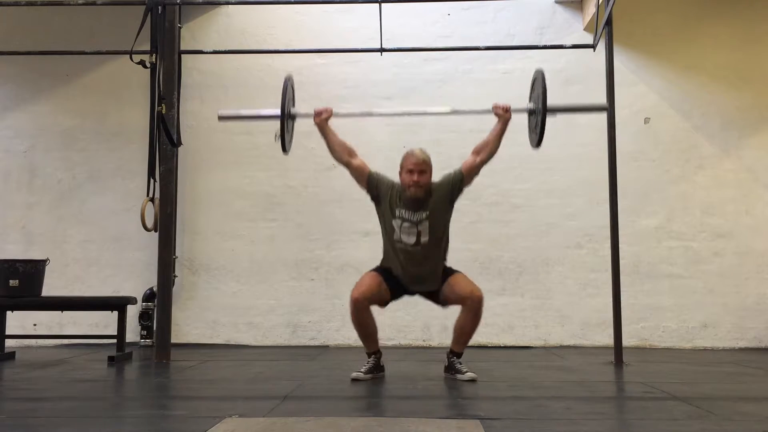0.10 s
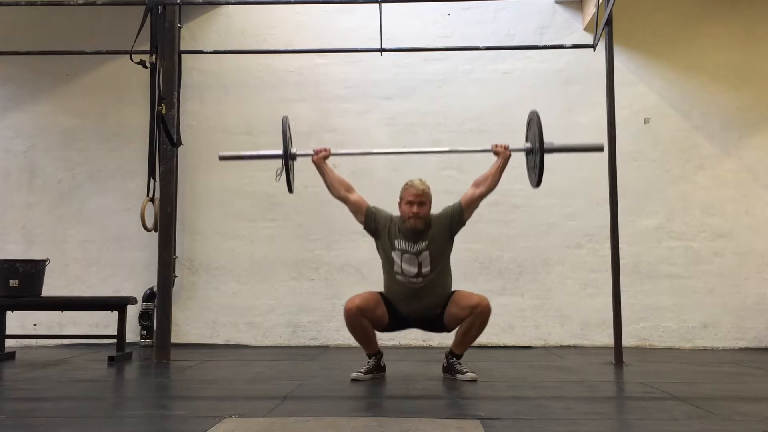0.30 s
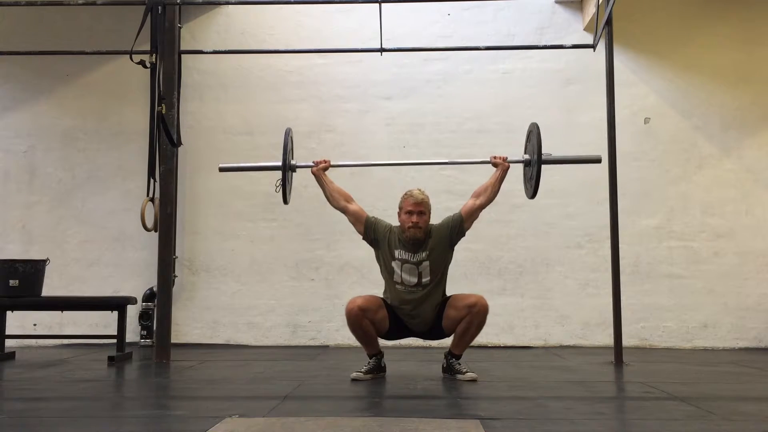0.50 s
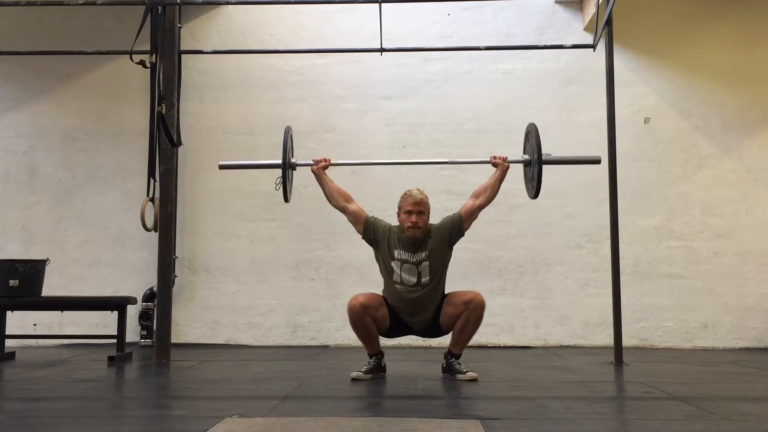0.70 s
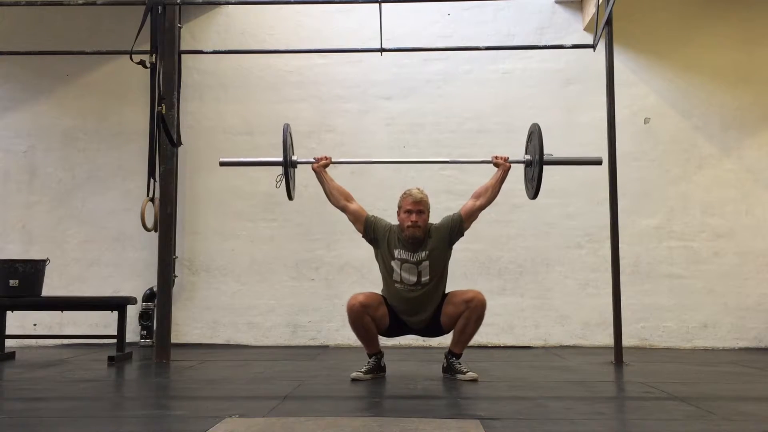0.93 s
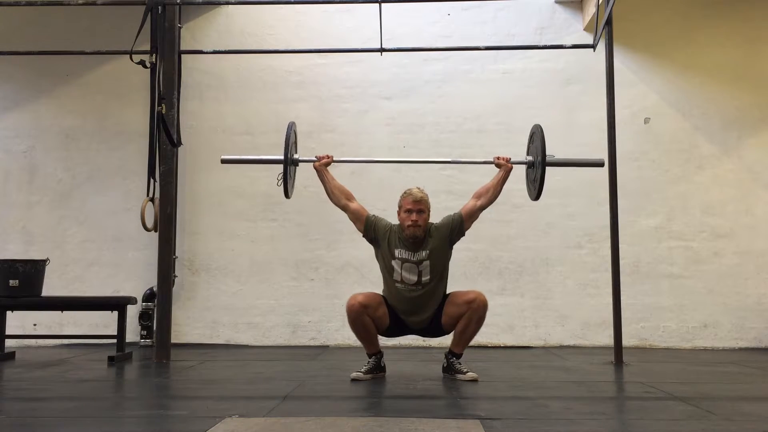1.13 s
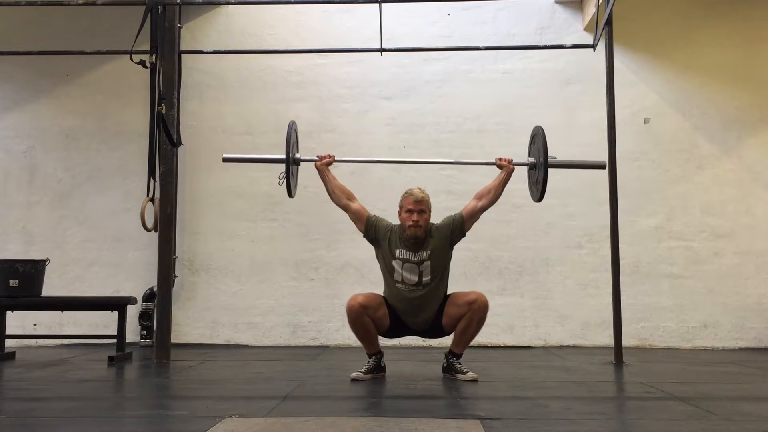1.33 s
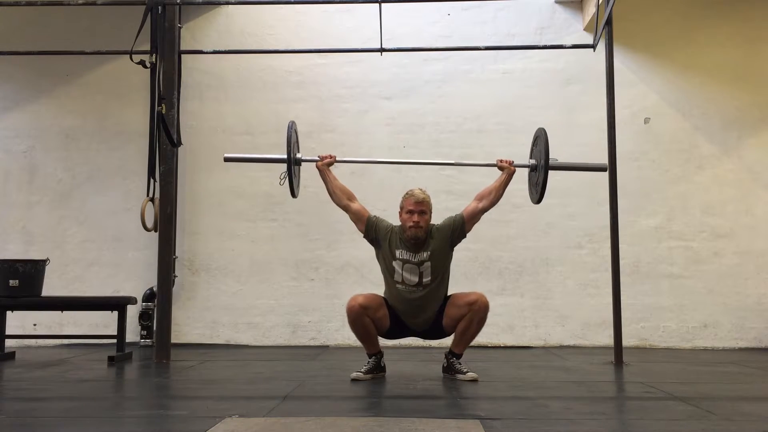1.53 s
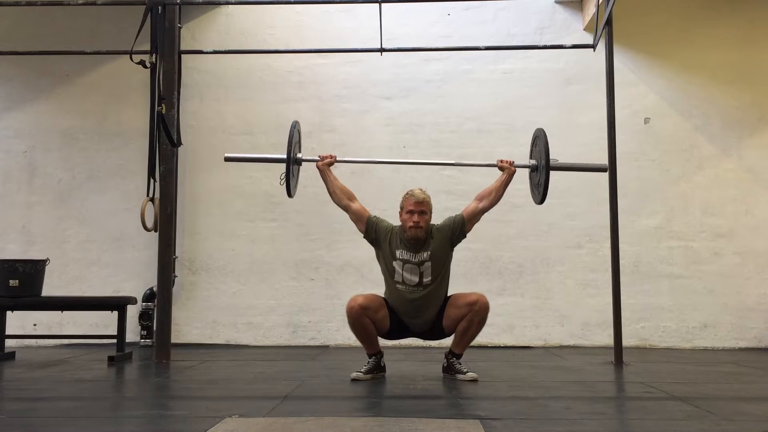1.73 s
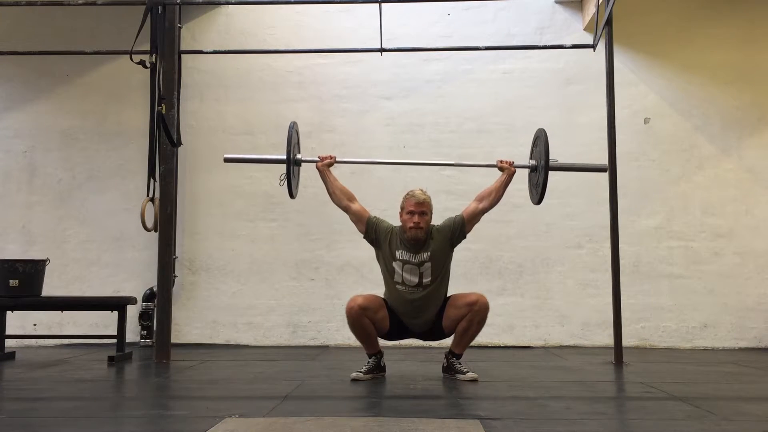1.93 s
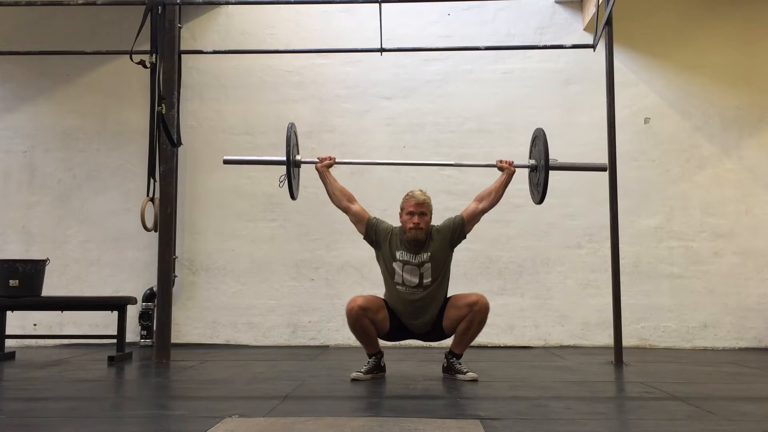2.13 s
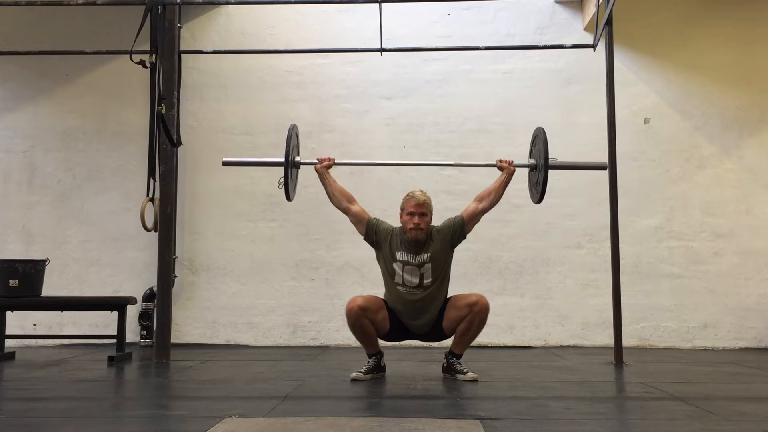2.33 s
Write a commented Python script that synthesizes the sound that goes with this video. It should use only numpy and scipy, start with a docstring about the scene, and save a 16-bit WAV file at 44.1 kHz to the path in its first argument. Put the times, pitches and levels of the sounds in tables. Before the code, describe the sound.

A single sharp slap of shoes on a rubber gym floor, preceded by a faint metallic rattle of barbell plates, then a long hollow reverberation in a large bare hall with low ventilation drone; one distant microphone.

```python
"""Shoe slap in a gym hall

A lifter's shoes slap a rubber floor once under a barbell: a burst of noisy cracks and damped mat modes.
Six early echoes, band-wise decaying noise and standing waves ring on for over a second; the slab booms low.
Noise-driven plate resonances chatter faintly before the landing and fade after it.
Ventilation drones throughout, as coloured noise with narrow noise bands.
"""
import sys
import numpy as np
from scipy import signal
from scipy.io import wavfile
from scipy.ndimage import uniform_filter1d

SR = 44100
rng = np.random.default_rng(int(sys.argv[2]) if len(sys.argv) > 2 else 0)


def output_pcm(signal):
    """Save a mono or channel-first signal as 16-bit PCM at the path in sys.argv[1].

    Samples are clipped to [-1, 1] before scaling.
    """
    pcm = np.clip(np.atleast_2d(signal).T, -1, 1) * 32767
    wavfile.write(sys.argv[1], SR, np.round(pcm).astype(np.int16))


def elevation(decibels):
    """Turn decibel levels (scalar or array-like) into linear amplitude ratios."""
    levels = np.asarray(decibels, float)
    return 10 ** (levels / 20)


N = 108045  # samples
LAND_S = 0.2053  # the shoes meet the floor

# Relative spectrum of the cracks: (frequency [Hz], density [dB per Hz])
CRACK_SPECTRUM = [(200, -45), (500, -20.5), (1000, 0.5), (1500, -1), (1950, -13), (2400, 1), (2750, -13),
                  (3400, -0.5), (4300, -10.5), (5100, -12.5), (6300, -19), (7500, -9), (9000, -19),
                  (11000, -23.5), (13500, -23.5), (16000, -32)]
# Damped modes of the rubber mat: (frequency [Hz], starting amplitude [dB], T60 [s])
MAT_MODES = [(378.5, -18, 0.0526), (643, -7.5, 0.044)]
# First echoes from near walls and roof: (delay [s], crack gain [dB], mat gain [dB], low-pass corner [Hz])
EARLY_ECHOES = [(.0036, -11, -16, 8000), (.0097, -6.5, -4.5, 6030), (0.0119, -6, -12.5, 14020),
                (.0203, -2.5, -0.5, 8000), (0.0239, -11.5, -10, 5940), (0.0287, -16, -3, 5930)]
# Relative starting spectrum of the reverberation: (frequency [Hz], density [dB per Hz])
HALL_SPECTRUM = [(90, -45), (150, -15), (250, -21), (285, -2), (350, -0.5), (460, -6), (640, -5.5),
                 (730, -10), (1000, -13), (1300, -18.5), (2000, -19), (3000, -22.5), (4000, -23),
                 (4500, -28.5), (6500, -30), (9000, -38.5), (12000, -45), (15500, -50), (16100, -71)]
# Reverberation time of the hall: (frequency [Hz], T60 [s])
HALL_DECAY = [(120, 0.55), (240, 1.0), (300, 1.294), (430, 1.37), (550, 1.73), (700, 1.98), (1300, 2.2),
              (2500, 1.886), (4500, 1.536), (7000, 1.03), (10000, 0.72), (12500, .62), (15500, .5)]
# Standing waves in the tail: (frequency [Hz], width of each pass [Hz], starting level [dB], T60 [s])
STANDING_WAVES = [(281.3, 15, -24.5, 0.8), (339, 6, -20.5, 0.48), (417, 22, -19.5, .6),
                  (503, 16, -26.5, .7), (578, 11, -28.5, 0.65), (645, 12, -27, .8), (685, 28, -28, 1.0),
                  (1144, 15, -31.5, 1.0)]
# Resonances of the plates: (frequency [Hz], width of each pass [Hz], relative level [dB])
PLATE_MODES = [(1663, 130, -3), (3000, 260, -4.5), (5290, 150, -5), (7330, 740, -11), (8350, 990, -9),
               (11400, 2000, -21), (15000, 1200, -28), (3600, 5400, -10)]
# Brief harder rubs:
# (time [s], added force re steady rub [dB], centre frequency [Hz], spread [octaves], fade constant [s])
HARD_RUBS = [(.0885, 14, 11000, .6, .003), (.090, 9, 5290, .15, .008), (.103, 10, 8200, .2, .006)]
# Relative spectrum of the ventilation wash: (frequency [Hz], density [dB per Hz])
AIR_SPECTRUM = [(15, -78), (25, -51), (60, -7.5), (80, -4.5), (108, -6.5), (273, -9), (330, -27),
                (470, -27.5), (510, -13), (669, -28.5), (854, -25.5), (1600, -23), (2330, -36),
                (15200, -71.5), (16500, -75)]
# Fuzzy duct drones: (frequency [Hz], width of each pass [Hz], level [dB])
DUCT_DRONES = [(79, 17, -46), (154.7, 26, -56.5), (275, 78, -54), (550, 50, -63), (850.6, 150, -59),
               (1127, 32.2, -63), (1636, 110, -59.5), (2000, 120, -67.5), (2500, 50, -75),
               (3100, 130, -77.5), (5630, 340, -85.5)]


def evened(x):
    """Normalization: divides a signal by its root mean square."""
    return x / np.sqrt(np.mean(x ** 2) + 1e-20)


def read(points, hz):
    """Interpolation of a table linearly in log frequency, as hearing spaces pitch."""
    f, value = np.transpose(points)
    return np.interp(np.log(hz + 1), np.log(f + 1), value)


def add(mix, s, sound):
    """Superposition: sums a sound into the mix from time s on."""
    part = mix[round(s * SR):][:len(sound)]
    part += sound[:len(part)]


def resonate(x, hz, width):
    """Resonance of unit peak gain: a one-pole low-pass shifted up to the resonant frequency."""
    turn = np.exp(2j * np.pi * hz * np.arange(len(x)) / SR)
    r = np.exp(-np.pi * width / SR)
    return 2 * (turn * signal.lfilter([1 - r], [1, -r], x / turn)).real


def narrow_band(x, hz, width):
    """Cascaded resonance: two equal passes steepen the skirts."""
    return resonate(resonate(x, hz, width), hz, width)


def colour(points, size=2048):
    """Minimum phase: the log magnitude alone fixes a causal impulse response."""
    hz = np.abs(np.fft.fftfreq(size, 1 / SR))
    log_gain = np.log(elevation(read(points, hz)) + 1e-5)
    spectrum = np.exp(np.conj(signal.hilbert(log_gain)))
    return np.fft.ifft(spectrum).real[:size // 2]


def noise(field_db, size):
    """Short-time synthesis: random Fourier coefficients weighted by field_db(Hz, s)."""
    frames = N * 4 // size + 5
    hz = np.fft.rfftfreq(size, 1 / SR)[:, None]
    t = np.arange(frames) * size / 4 / SR
    a, b = rng.standard_normal((frames, size // 2 + 1, 2)).T
    coefficients = (a + 1j * b) * elevation(field_db(hz, t))
    return signal.istft(coefficients, nperseg=size, noverlap=size * 3 // 4)[1][:N]


def slap(crack_db=0, mat_db=0):
    """Impact excitation: cracks swell as the soles flatten, stop short, and leave the mat ringing."""
    crack_s, swell, mat_lag_s = 0.0026, 0.94, 0.0012
    rms_db = -14  # of the cracks while they last, before crack_db
    t = np.arange(round(0.08 * SR)) / SR
    # random signs; the exponent below 1 evens out the crack sizes
    cracks = rng.choice([-1, 1], len(t)) * rng.exponential(1, len(t)) ** 0.8
    cracks *= (t < crack_s) * (0.5 + swell * t / crack_s)
    crack = signal.oaconvolve(cracks, colour(CRACK_SPECTRUM))[:len(t)]
    crack *= elevation(rms_db + crack_db) / np.sqrt(np.mean(crack[t < crack_s] ** 2))
    late = np.maximum(t - mat_lag_s, 0)
    mat = sum(elevation(mat_db + db - 60 * late / t60) * np.sin(2 * np.pi * hz * late)
              for hz, db, t60 in MAT_MODES)
    return crack + mat


def echoes():
    """Early reflection: the direct slap, then delayed, low-passed slaps with freshly drawn cracks."""
    out = np.zeros(N)
    add(out, LAND_S, slap())
    for delay, crack_db, mat_db, top_hz in EARLY_ECHOES:
        low_pass = signal.butter(1, top_hz, fs=SR)
        add(out, LAND_S + delay, signal.lfilter(*low_pass, slap(crack_db, mat_db)))
    return out


def hall():
    """Diffuse reverberation: each band of noise decays at its own rate, with a few standing waves."""
    start_s, rise_s = 0.004, 0.0068  # delay after the landing, time constant of the build-up
    diffuse_db = -13  # rms of the first 0.1 s, before standing waves and build-up
    bend = 1.07  # above 1 the decay steepens as it goes

    def field_db(hz, t):
        return read(HALL_SPECTRUM, hz) - 60 * (t / read(HALL_DECAY, hz)) ** bend

    t = np.arange(N) / SR
    tail = noise(field_db, size=2048)
    tail *= elevation(diffuse_db) / np.std(tail[:SR // 10])
    for hz, width, db, t60 in STANDING_WAVES:
        mode = evened(narrow_band(rng.standard_normal(N), hz, width))
        tail += elevation(db - 60 * t / t60) * mode
    out = np.zeros(N)
    add(out, LAND_S + start_s, tail * (1 - np.exp(-t / rise_s)))
    return out


def boom():
    """Low-frequency structural vibration: the floor slab swings up slowly and dies away."""
    hz, peak_db, peak_s, sharpness = 48.8, -32, 0.13, 5.4
    t = np.maximum(np.arange(N) / SR - LAND_S, 0)
    u = t / peak_s
    envelope = (u * np.exp(1 - u)) ** sharpness  # reaches 1 at peak_s
    return elevation(peak_db) * envelope * np.sin(2 * np.pi * hz * t)


def plates():
    """Friction excitation: rubbing on the sleeve drives the plate modes until the landing."""
    start_db, t60_s, flutter_db = -58.5, 2.9, 0.5  # gain at time 0, its decay, rms flutter of the force
    fade_s = 0.1  # time constant after the landing
    t = np.arange(N) / SR
    hz = np.transpose(PLATE_MODES)[0][:, None]
    flutter = evened(uniform_filter1d(rng.standard_normal(N), size=600))
    force = elevation(flutter_db * flutter) * np.ones_like(hz)
    for s, db, centre_hz, octaves, rub_fade_s in HARD_RUBS:
        share = np.exp(-(np.log2(hz / centre_hz) / octaves) ** 2)
        force += elevation(db) * share * np.exp(-np.abs(t - s) / rub_fade_s) * (t > s)
    rub = rng.standard_normal((len(PLATE_MODES), N)) * force
    # dividing by the root of the width offsets the lower power passed by narrow modes
    out = sum(elevation(db) / np.sqrt(width / SR) * narrow_band(x, f, width)
              for x, (f, width, db) in zip(rub, PLATE_MODES))
    return out * elevation(start_db - 60 * t / t60_s) * np.exp(-np.maximum(t - LAND_S, 0) / fade_s)


def air():
    """Broadband flow noise: a ventilation wash with drifting patches, and fuzzy narrow-band drones."""
    wash_db, patch_db, waver_db = -44, 0.74, 3  # rms wash, rms patches, rms waver of the drone drive

    def field_db(hz, t):
        patches = rng.standard_normal((len(t), len(hz))).T
        patches = uniform_filter1d(patches, size=10, axis=0)  # along frequency
        patches = uniform_filter1d(patches, size=6, axis=1)  # along time
        return read(AIR_SPECTRUM, hz) + patch_db * evened(patches)

    wash = elevation(wash_db) * evened(noise(field_db, size=2048))
    waver = rng.standard_normal((len(DUCT_DRONES), N))
    for _ in range(2):
        waver = uniform_filter1d(waver, size=3000, axis=1)
    drive = rng.standard_normal((len(DUCT_DRONES), N)) * elevation(waver_db * evened(waver))
    drones = sum(elevation(db) * evened(narrow_band(x, hz, width))
                 for x, (hz, width, db) in zip(drive, DUCT_DRONES))
    return wash + drones


def scene():
    """Linear superposition of all sources, in one channel."""
    return (echoes() + hall() + boom() + plates() + air())[None]


def top_cut(x):
    """Nothing passes above the cut-off."""
    return signal.sosfilt(signal.butter(12, 16850, fs=SR, output="sos"), x)


def record(dry):
    """Band limitation and compression: microphone hiss, then gain control that dips and recovers."""
    hiss_db, low_hz, stop_hz = -81.5, 38, 17500  # rms hiss, high-pass corner, 50 dB stop-band edge
    knee_db, squeeze = -23, 0.29  # threshold, dB of gain cut per dB above it
    release_db_per_s = 13  # fall of the held level
    heard = dry + elevation(hiss_db) * rng.standard_normal(N)
    heard = signal.sosfilt(signal.butter(2, low_hz, "high", fs=SR, output="sos"), heard)
    heard = signal.sosfilt(signal.cheby2(10, 50, stop_hz, fs=SR, output="sos"), heard)
    # the origins make both averages look back in time
    power = uniform_filter1d(heard[0] ** 2, size=800, origin=399)
    power_db = 10 * np.log10(abs(power) + 1e-12)
    fall = np.arange(N) * release_db_per_s / SR
    held_db = np.maximum.accumulate(power_db + fall) - fall
    over_db = np.maximum(held_db - knee_db, 0)
    cut_db = squeeze * uniform_filter1d(over_db, size=400, origin=199)
    return top_cut(heard / elevation(cut_db))


dry = scene()
out = record(dry)
output_pcm(out)
```